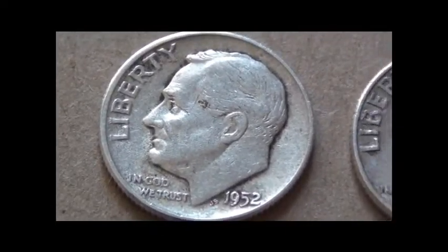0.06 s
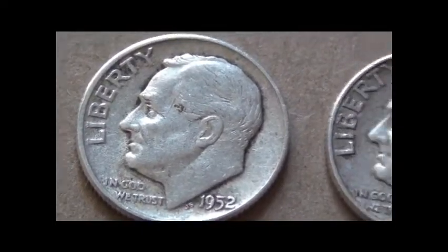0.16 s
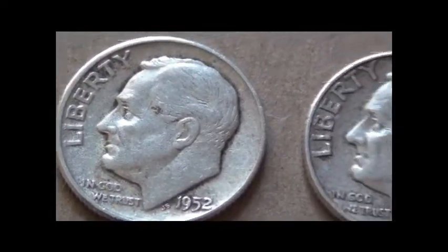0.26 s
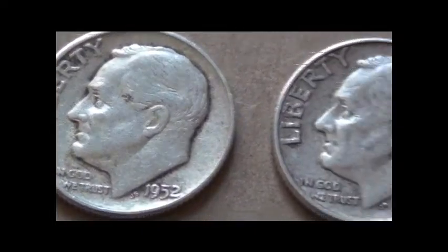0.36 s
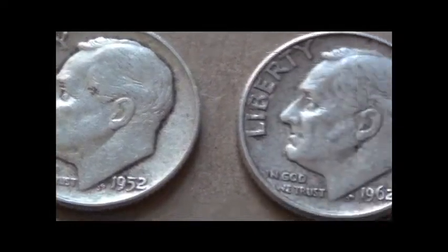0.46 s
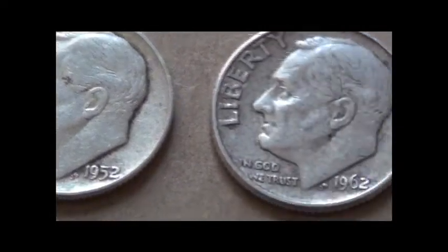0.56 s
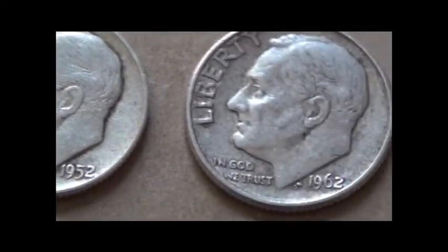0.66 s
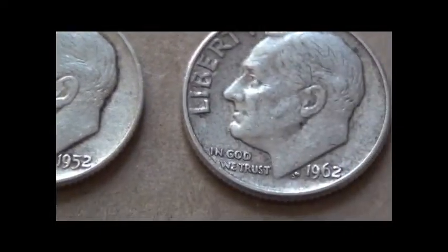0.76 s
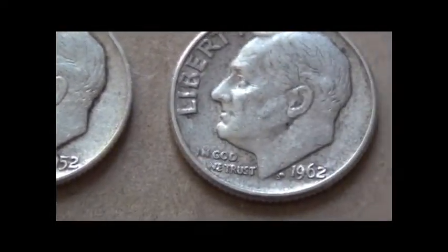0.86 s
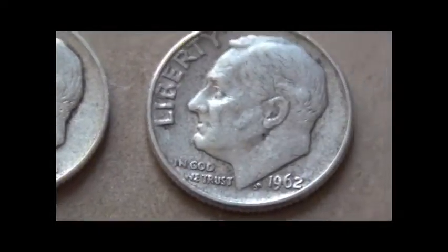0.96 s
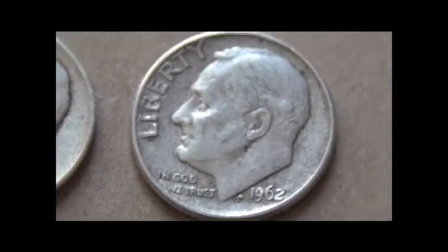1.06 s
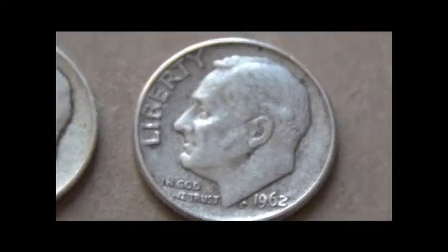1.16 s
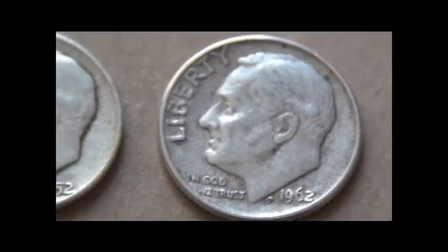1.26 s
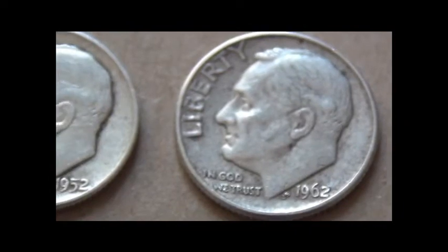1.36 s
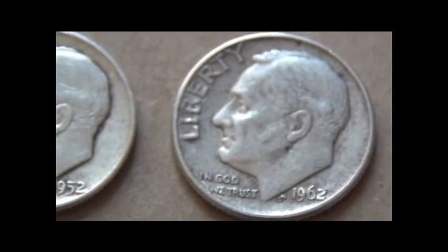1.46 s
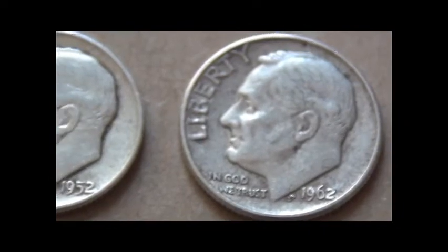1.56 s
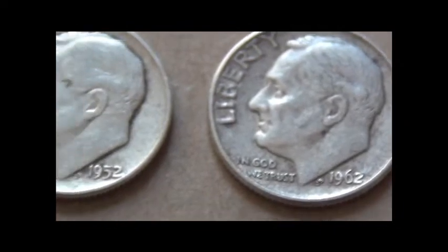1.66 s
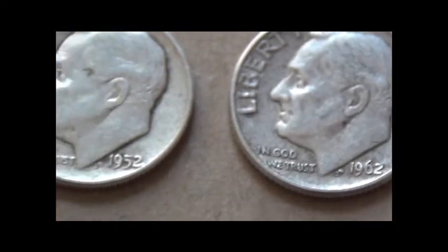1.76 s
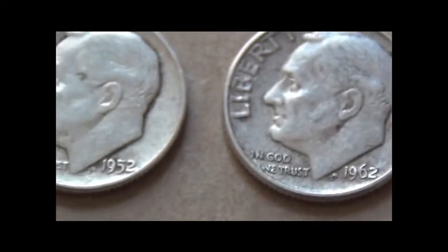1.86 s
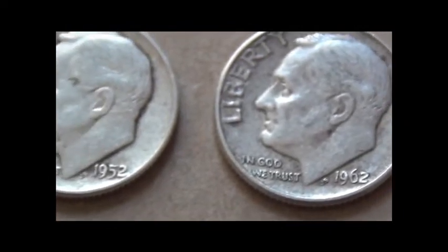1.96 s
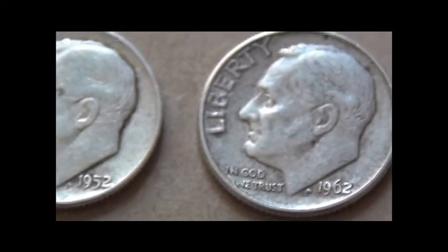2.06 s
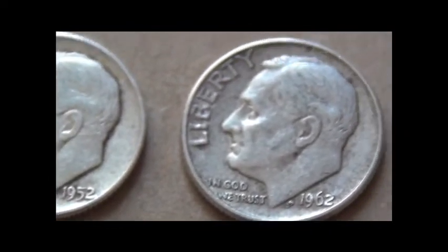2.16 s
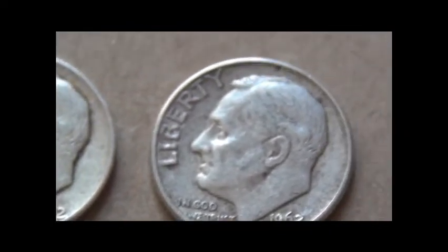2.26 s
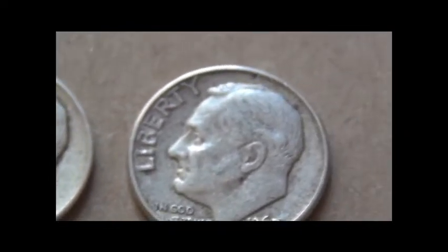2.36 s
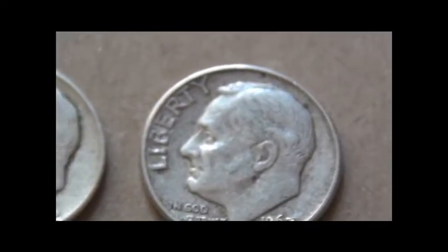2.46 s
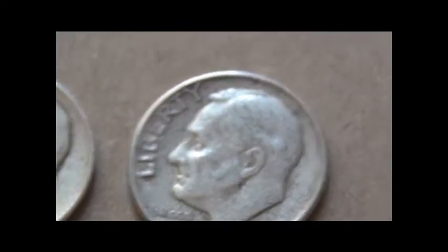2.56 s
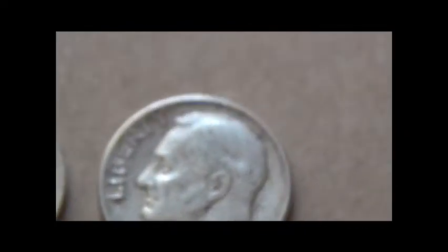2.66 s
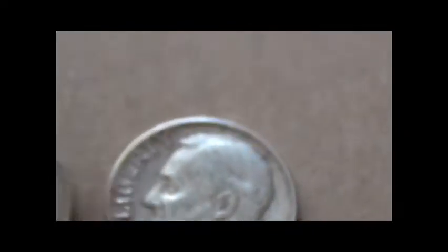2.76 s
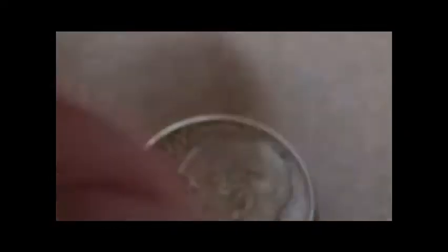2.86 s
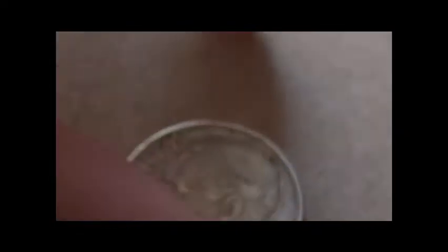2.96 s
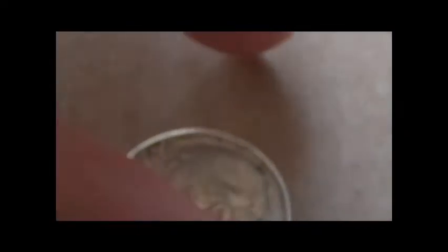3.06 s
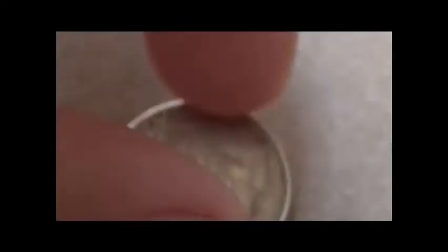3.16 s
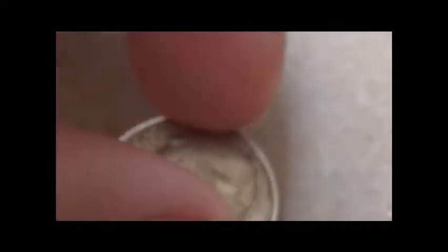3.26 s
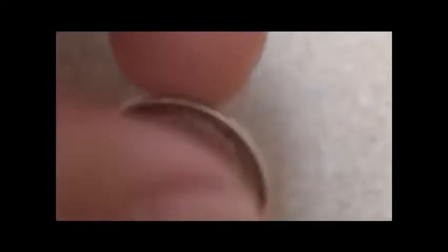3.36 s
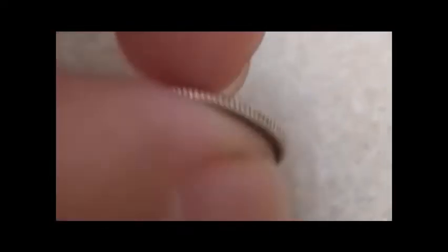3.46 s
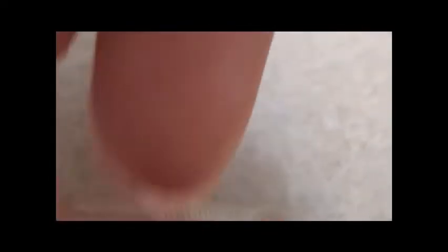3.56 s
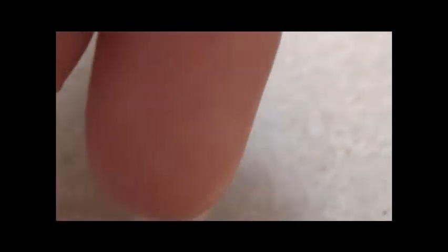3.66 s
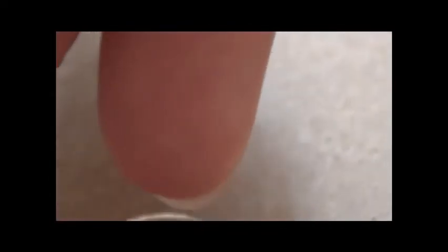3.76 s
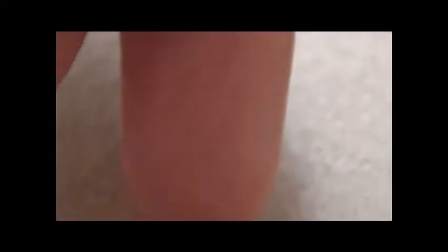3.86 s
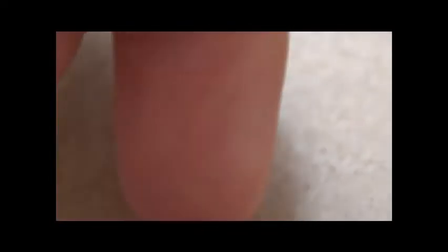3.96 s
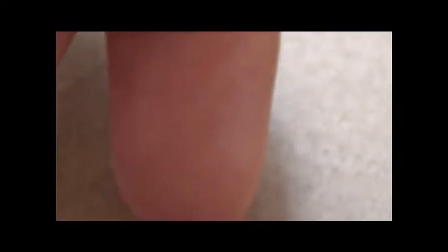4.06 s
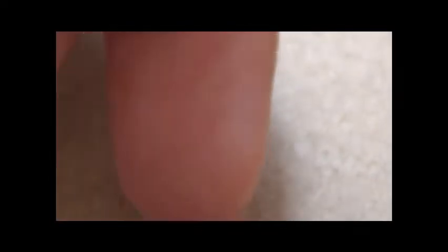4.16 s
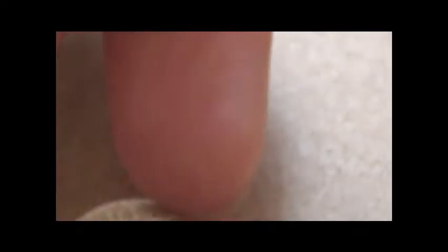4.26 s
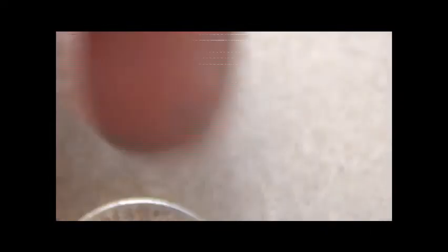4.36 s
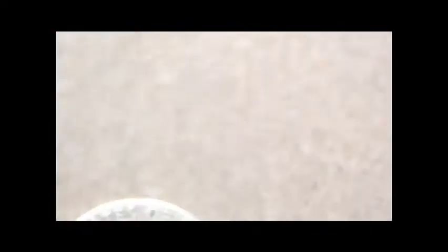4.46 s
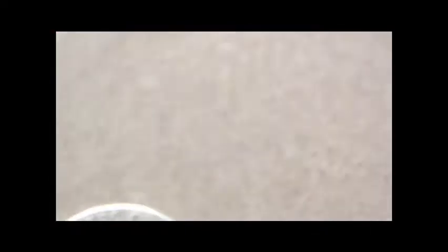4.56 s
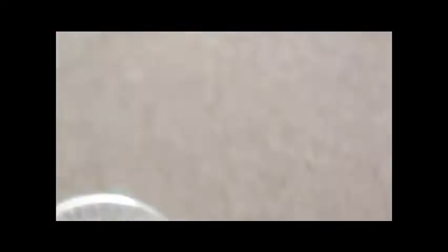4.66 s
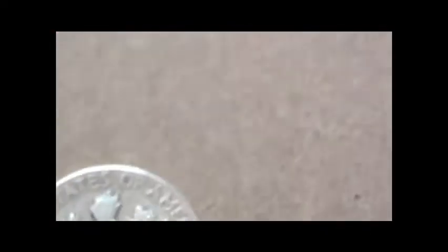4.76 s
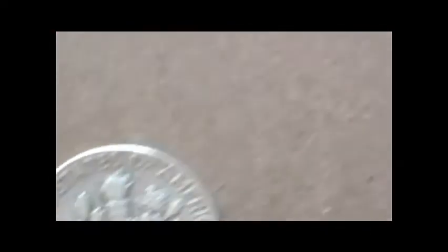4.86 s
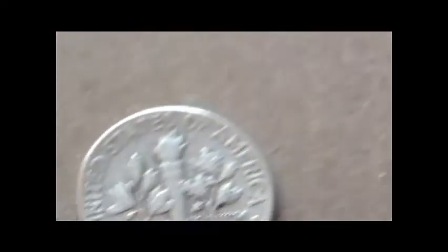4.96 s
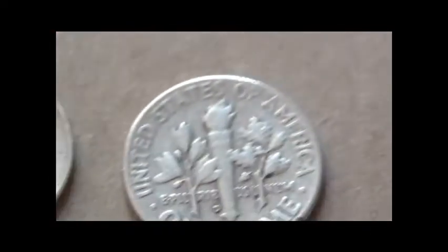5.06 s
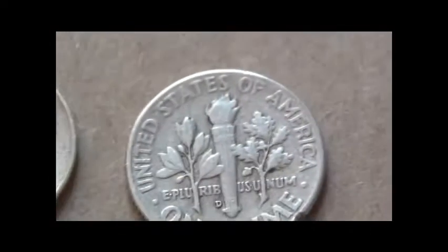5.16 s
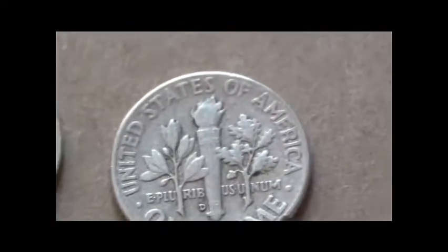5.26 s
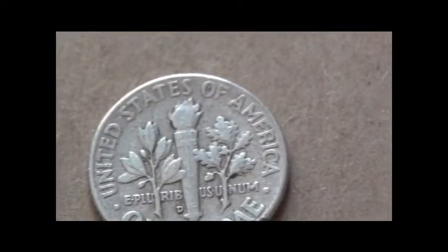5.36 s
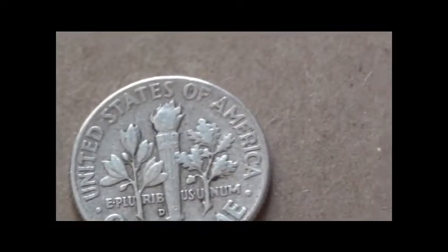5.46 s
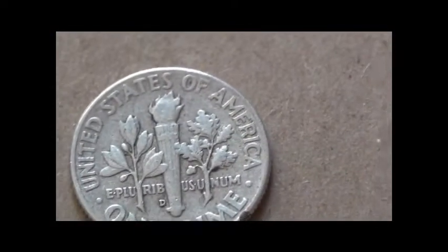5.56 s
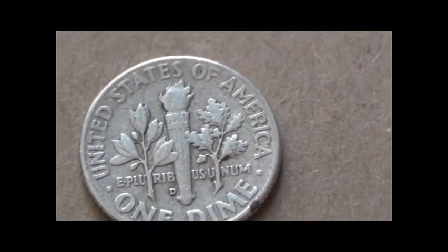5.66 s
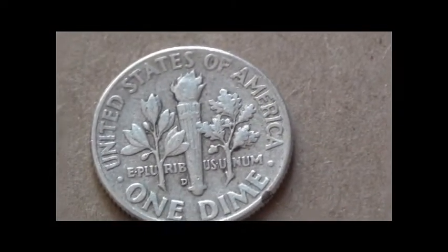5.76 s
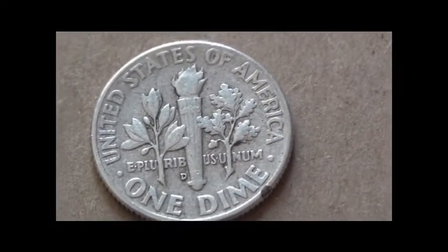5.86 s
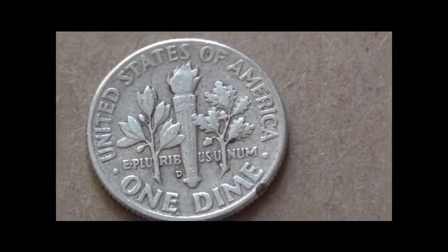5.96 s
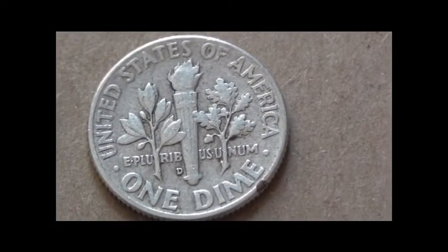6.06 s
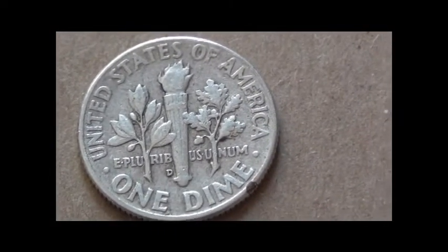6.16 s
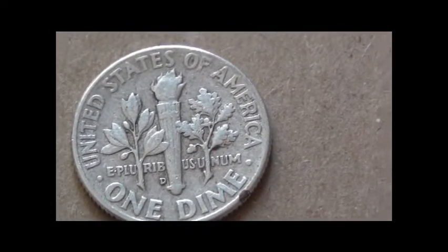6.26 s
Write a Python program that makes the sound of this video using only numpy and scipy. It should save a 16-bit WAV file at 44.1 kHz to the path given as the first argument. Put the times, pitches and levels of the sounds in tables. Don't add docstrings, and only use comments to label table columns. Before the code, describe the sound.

Close hand-held camera in a quiet room: soft hiss, low handling rumble and a faint whining, ticking lens motor. A hand thumps the desk once with a dull boom. Later fingers press a small coin, scrape its rim over cardboard in short rasps, and knock it sharply. It drops with two bright, hard clacks, then faint skin brushes fade back into hiss.

```python
import sys
import numpy as np
from scipy import signal
from scipy.io import wavfile

SR = 44100
rng = np.random.default_rng(int(sys.argv[2]) if len(sys.argv) > 2 else 0)


def linear_from_db(decibels):
    return 10 ** (np.asarray(decibels, float) / 20)


def to_wav(s):
    ch = np.atleast_2d(s).T
    pcm = np.round(np.clip(ch, -1, 1) * 32767)
    wavfile.write(sys.argv[1], SR, pcm.astype(np.int16))


N = 277830

# start in seconds, peak in dB, contact hardness in Hz,
# level of the stiff card tones in dB.
PRESSES = [(2.4896, -44, 2520, -24), (2.654, -39.5, 3000, 11), (2.9458, -17, 2570, 0),
           (3.081, -29.5, 2500, 3), (3.251, -34, 6050, 2), (3.566, -23, 2000, -1), (3.866, -29.5, 2500, -2),
           (4.343, -49, 2980, 16)]
# start in seconds, peak in dB, contact hardness in Hz, level of the
# stiff card tones in dB, drum pitch as the grip loads the sheet as a ratio.
RIM_HITS = [(3.152, -31, 1500, -3, 0.96), (3.1765, -7, 3800, -2.5, .9), (3.3945, -21, 1500, 0, 1.15),
            (3.4125, -21, 1500, -3, 1.12), (3.4716, -10, 3620, -2, 1.008), (3.7505, -27, 1010, 14, 1.02),
            (3.7562, -24, 1220, 8, 0.95)]
# start in seconds, peak in dB, contact hardness in Hz,
# level of the stiff card tones in dB.
BOUNCES = [(3.7757, -6.5, 5170, 9.5), (3.8005, -9.5, 6900, 7.5), (3.811, -28, 2000, 6),
           (3.89, -26, 2500, -1), (3.934, -44.5, 1200, -6)]
PRESS_DESK_DB, RIM_DESK_DB, BOUNCE_DESK_DB = -12, -26, -35
COIN_FREE_S, COIN_FREE_DB = 3.7772, -32.5

# pitch in Hz, level in dB, 60 dB decay in seconds.
CARD_DRUM = [(711, 3.5, 0.025), (213, -13.5, 0.063), (624, -20, 0.075), (305, -22.5, 0.14),
             (780, -34, 0.019)]
CARD_LOW = [(220, -14, 0.091), (313, -15.5, 0.08), (415, -1, 0.016), (550, 1, 0.036), (691, 5, 0.032),
            (794, 4, 0.03), (953, -5, 0.027)]
CARD_MID = [(1210, -2.5, 0.0096), (1554, 2.5, 0.0084), (1915, -1, 0.0069), (2633, -1.5, 0.0078),
            (2990, 0, 0.0064), (3387, 3, 0.0037)]
CARD_TOP = [(5340, -4.5, 0.0047), (7090, -4.5, 0.0049), (9500, 5.5, 0.0015), (11500, 7, 0.00077),
            (13300, -2.5, 0.0022), (15200, -10, 0.0022)]
# pitch in Hz, level in dB, 60 dB decay in seconds.
COIN = [(8880, -9, .1), (8880, -9, .035), (8760, -18, .1), (14900, -14, .05), (14960, 0, .07),
        (14960, -1, .015)]
# pitch in Hz, level in dB, 60 dB decay in seconds.
DESK = [(108.4, -7, 0.29), (138.3, -18, 0.63), (189, 9, 0.079), (237.8, 0.5, 0.18), (363, 5.5, 0.13),
        (426, 6, 0.05), (565, -13, 0.069), (744, 5.5, 0.041), (860, -17, .03)]
DESK_BOOM = [(75.7, 0, 0.27), (60.7, 0, 0.2)]

# moment of most pressure in seconds, card drone in dB,
# rise in seconds, fall in seconds, speed as rasp in dB over the drone.
STROKES = [(3.000, -52.5, 0.059, 0.035, -2), (3.041, -43, 0.035, 0.02, -5.5),
           (3.097, -46.5, 0.021, 0.054, 0.5), (3.158, -33, 0.041, 0.027, -4.5),
           (3.176, -34, 0.024, 0.012, 1), (3.199, -41, 0.046, 0.034, -5), (3.271, -48.5, 0.04, 0.02, -1.5),
           (3.380, -40.5, 0.027, 0.037, -0.5), (3.400, -31, 0.022, 0.027, 3),
           (3.415, -29.5, 0.014, 0.0047, 7.5), (3.429, -45, 0.019, 0.034, -4),
           (3.499, -39, 0.0081, 0.011, -6.5), (3.573, -42, 0.0054, 0.034, 8),
           (3.589, -29, 0.029, 0.038, -2), (3.625, -35.5, 0.017, 0.011, -10),
           (3.672, -32, 0.049, 0.061, -6.5), (3.71, -33, 0.023, 0.0085, -12),
           (3.755, -31, 0.022, 0.027, -13.5), (3.792, -42, 0.016, 0.015, 1),
           (3.819, -48, 0.0079, 0.05, -0.5), (3.902, -50, 0.055, 0.026, -1)]
# moment of most pressure in seconds,
# card drone in dB, speed as rasp in dB over the drone.
BRUSHES = [(4.037, -58.5, -0.5), (4.177, -62, 8.5), (4.209, -57, 3.5), (4.232, -53, -4.5),
           (4.260, -63, -3.5), (4.289, -57.5, -1), (4.335, -63, -2), (4.37, -70, -3), (4.40, -80, 9)]
BRUSH_RISE_S, BRUSH_FALL_S = 0.016, 0.03
# start in seconds, peak in dB, pitch in Hz, ring in cycles.
TICKS = [(.330, -42.5, 960, 17), (0.9776, -31, 10600, 8.9), (1.009, -47, 2170, 16), (1.6274, -28, 2850, 19),
         (1.629, -25.5, 377, 18), (1.628, -30, 8400, 98), (1.639, -36, 2900, 46), (1.645, -42, 8500, 40),
         (1.682, -31, 830, 12.6), (1.756, -39.5, 8100, 25), (1.628, -33, 11500, 13), (2.490, -44, 3230, 15),
         (2.490, -38.5, 4800, 14), (2.490, -40.5, 8700, 15), (4.175, -54, 7550, 17),
         (4.2102, -38, 9500, 4.3), (4.288, -45.5, 2900, 14), (4.289, -54, 8700, 20), (4.567, -48, 6000, 4),
         (4.852, -47, 2200, 8), (4.908, -49, 2280, 16)]
# start in seconds, peak in dB, contact hardness in Hz, boom in dB.
THUMPS = [
    (1.6264, -14, 510, -11),
    (2.489, -35.5, 590, -26),
    (2.947, -28.5, 410, -15),
]

# time in seconds, rumble in dB.
GRIP = [(0, -64), (0.35, -67), (0.7, -52), (0.82, -60), (1.03, -59), (1.2, -66.5), (1.32, -59),
        (1.5, -66.5), (1.8, -60), (2.2, -65.5), (2.9, -63.5), (3.95, -73.5), (4.2, -63), (4.55, -83),
        (4.75, -67.5), (5.13, -69.5), (5.5, -72.5), (6.3, -64.5)]
# frequency in Hz, density in dB per Hz.
RUMBLE = [(15, -50), (25, 5), (71, -13), (118, 5), (162, -40), (211, 1.5), (299, 1), (500, -11.5),
          (650, -28), (1100, -120)]
# moment in seconds (the jolt sets in about 25 ms before it), peak in dB.
JOLTS = [(0.12, -59), (0.741, -56), (0.846, -62), (1.017, -50), (1.315, -54), (2.1, -68), (2.35, -57),
         (3.28, -48), (3.6, -56), (4.831, -56), (5.0, -65)]
# pitch in Hz, level in dB, 60 dB decay in seconds.
JOLT_TONES = [(55, -3, 0.15), (90.5, -3, 0.17)]

# time in seconds, whine in dB.
MOTOR = [(0.03, -78), (0.055, -55.5), (0.6, -55.5), (1.0, -61), (1.12, -68), (2.2, -71), (2.9, -72),
         (3.95, -64.5), (4.36, -65.5), (4.39, -62.5), (5.02, -63), (5.19, -70.5), (5.24, -68.5),
         (5.8, -66.5), (6.3, -79)]
# centre in seconds, level in dB.
SURGES = [(0.385, -49.5), (0.588, -55), (0.735, -60), (1.0, -67), (2.30, -60), (2.655, -63), (2.831, -79),
          (4.57, -58.5), (4.69, -66), (4.775, -54), (4.92, -61), (5.385, -64)]
SURGE_S, WHINE_HZ = 0.034, 906
# time in seconds, click peak in dB, pitch in Hz.
LENS = [(0, -61, 2700), (1.0, -59, 2740), (2.9, -57.5, 2735), (3.9, -59.5, 2560), (4.7, -61, 2650),
        (5.2, -58, 2480), (5.35, -58, 2640), (5.7, -64, 2740), (6.3, -64, 2720)]
# from in seconds, to in seconds.
LENS_RESTS = [(4.15, 4.42), (4.82, 5.21)]
FRAME_RATE = 29.97

# time in seconds, gain in dB.
GAIN = [(0, 0), (2.9, -0.5), (3.78, 2), (3.83, -7.5), (6.3, -5.5)]
# frequency in Hz, density in dB per Hz.
HISS = [(24, -46), (40, -21), (112, 1), (147, -10), (231, 0), (382, -10.5), (600, -4), (751, -9),
        (896, -3.5), (1680, -10), (2770, -10.5), (3380, -13.5), (16000, -17)]
HISS_DB = -53.5
# pitch in Hz, width in Hz, level in dB.
HUMS = [(227, 92, -72.5), (610.8, 69, -68.5), (1211, 23, -73.5), (2245, 110, -73)]
LINE_HZ = 15734
# frequency in Hz, likeness from 0 to 1.
LIKENESS = [(60, 0.97), (180, 0.97), (550, 0.14), (1650, 0.13), (4970, 0.42), (15000, 0.77)]


def rms_one(x):
    return x / np.sqrt(np.mean(x ** 2) + 1e-20)


def in_time(rows):
    s, *columns = np.transpose(rows)
    return [np.interp(np.arange(N) / SR, s, column) for column in columns]


def at_hz(points, hz):
    table_hz, value = np.transpose(points)
    return np.interp(np.log(hz), np.log(table_hz), value)


def drift(rate):
    r = np.exp(-80 * np.pi * rate / SR)
    white = rng.standard_normal(N // 40 + 2002)
    slow = signal.lfilter([1], [1, -2 * r, r * r], white)[2000:]
    return np.interp(np.arange(N) / 40, np.arange(len(slow)), rms_one(slow))


def band(x, low_hz, high_hz):
    return signal.sosfilt(signal.butter(2, [low_hz, high_hz], "band", fs=SR, output="sos"), x)


def ring(force, modes, scatter_db=0):
    out = 0
    for k, (hz, level_db, t60) in enumerate(modes):
        r = linear_from_db(-60 / (t60 * SR))
        w = 2 * np.pi * hz / SR
        gain = (-1) ** k * linear_from_db(level_db + scatter_db * rng.standard_normal())
        out = out + gain * signal.lfilter([0, np.sin(w)], [1, -2 * r * np.cos(w), r * r], force + 1e-18)
    return out


def contact(hz):
    push = np.zeros(SR // 4)
    push[0] = -1
    return signal.sosfilt(signal.butter(2, np.clip(hz, 50, .45 * SR), fs=SR, output="sos"), push)


def add(out, s, sound, peak_db, pan_db=0):
    i = round((s + .001) * SR)
    sound = sound[:N - i] / abs(sound).max()
    out[:, i:i + len(sound)] += sound * linear_from_db(peak_db + pan_db * np.array([[.5], [-.5]]))


def knocks():
    out = np.zeros((2, N))
    for blows, desk_db in ((PRESSES, PRESS_DESK_DB), (RIM_HITS, RIM_DESK_DB), (BOUNCES, BOUNCE_DESK_DB)):
        for s, peak_db, hz, stiff_db, *ratio in blows:
            push = contact(hz)
            sheet = np.array(CARD_DRUM) * [np.prod(ratio), 1, 1]
            drum, stiff, top = [ring(push, modes, scatter_db=1.5) for modes in (sheet, CARD_MID, CARD_TOP)]
            snap = linear_from_db(-3) * np.diff(push, prepend=0)
            add(out, s, drum + linear_from_db(stiff_db) * (stiff + top + snap), peak_db, pan_db=2)
            add(out, s, ring(contact(750), DESK), peak_db + desk_db)
    add(out, COIN_FREE_S, ring(contact(14000), COIN), COIN_FREE_DB, pan_db=5)
    return out


def strokes():
    t = np.arange(N) / SR
    power = np.zeros((3, N))
    brushes = [(s, db, BRUSH_RISE_S, BRUSH_FALL_S, speed_db) for s, db, speed_db in BRUSHES]
    for s, drone_db, rise, fall, rasp_db in STROKES + brushes:
        hiss_db = rasp_db - 7.5
        pressure = np.interp(t, [s - rise, s, s + fall], [0, 1, 0])
        power += (pressure ** 0.95 * linear_from_db(drone_db + np.array([[0], [rasp_db], [hiss_db]]))) ** 2
    out, clumps = 0, drift(130)
    for modes, level, catches_per_s in zip([CARD_LOW, CARD_MID, CARD_TOP], np.sqrt(power), [1500, 2500, 6000]):
        size_db = 1.8 * np.minimum(rng.exponential(1, (2, N)), 5) + 1.6 * clumps
        sizes = linear_from_db(size_db) * rng.choice([-1, 1], (2, N))
        caught = rng.random((2, N)) < catches_per_s / SR
        mid, side = ring(sizes * caught, modes)
        out = out + level * rms_one(mid + 0.13 * side * [[1], [-1]])
    return out * linear_from_db([[.7], [-.7]])


def ticks():
    out = np.zeros((2, N))
    for s, peak_db, hz, cycles in TICKS:
        tones = [(hz, 0, cycles / hz), (hz * 1.16, -5, cycles / hz / 2)]
        add(out, s, ring(contact(9100), tones), peak_db)
    return out


def thumps():
    out, t = np.zeros((2, N)), np.arange(SR // 4) / SR
    for s, peak_db, hz, boom_db in THUMPS:
        push = contact(hz)
        add(out, s, ring(push, DESK) + linear_from_db(52) * push, peak_db)
        add(out, s, ring(push, DESK_BOOM), peak_db + boom_db)
        rattle = band(rng.standard_normal(len(t)), 300, 950) * linear_from_db(-60 * t / 0.18)
        add(out, s + 0.00202, rattle, peak_db - 17)
    return out


def room(x):
    t = np.arange(SR // 4) / SR
    tail = rng.standard_normal((2, len(t))) * linear_from_db(-60 * t / 0.26) * (t > .003)
    tail = signal.lfilter([1], [1, -.6], tail)
    return linear_from_db(-54.5) * signal.fftconvolve(x, tail, axes=1)[:, :N]


def coloured(spectrum, patchy_db, count):
    edges = np.geomspace(spectrum[0][0], spectrum[-1][0], num=count)
    out, white = 0, rng.standard_normal((2, 2, N))
    for k, (low, high) in enumerate(zip(edges, edges[1:])):
        mid, side = band(white[k % 2], low, high)
        alike = np.clip(np.sqrt(at_hz(LIKENESS, low)), 0, 1)
        gain = linear_from_db(at_hz(spectrum, np.sqrt(low * high)) + patchy_db * drift(8))
        out = out + gain * (np.sqrt(1 + alike) * mid + np.sqrt(1 - alike) * side * [[1], [-1]])
    return rms_one(out)


def narrow(hz, width_hz):
    sos = signal.butter(1, [hz - width_hz / 2, hz + width_hz / 2], "band", fs=SR, output="sos")
    return rms_one(signal.sosfilt(np.vstack([sos, sos]), rng.standard_normal(N)))


def grip():
    out = linear_from_db(in_time(GRIP)[0] + 1.5 * drift(9)) * coloured(RUMBLE, patchy_db=3.5, count=10)
    for s, peak_db in JOLTS:
        add(out, s - .025, ring(contact(70), JOLT_TONES), peak_db)
    return out


def lens_motor():
    t = np.arange(N) / SR
    surge = sum(linear_from_db(db) * np.exp(-((t - s) / SURGE_S) ** 2 * 2) for s, db in SURGES)
    tone = np.sqrt(2) * np.sin(2 * np.pi * np.cumsum(WHINE_HZ + 14 * drift(20.74)) / SR)
    whine = rms_one(narrow(900, 104) + 0.41 * tone)
    return linear_from_db(in_time(MOTOR)[0] + 0.57 * drift(25)) * whine + surge * tone


def lens_clicks():
    out, (click_db, hz) = np.zeros((2, N)), in_time(LENS)
    t = np.arange(round(0.0096 * SR)) / SR
    step_s = (np.arange(1, 188) - .25) / FRAME_RATE
    for s, (pitch_chance, level_chance) in zip(step_s, rng.standard_normal((187, 2))):
        i = round(s * SR)
        blip = np.sin(2 * np.pi * hz[i] * (1 + .008 * pitch_chance) * t) * np.hanning(len(t))
        if not any(a < s < b for a, b in LENS_RESTS):
            add(out, s, blip, click_db[i] + 2 * level_chance)
    return out


def floor():
    hums = sum(linear_from_db(level_db) * narrow(hz, width_hz) for hz, width_hz, level_db in HUMS)
    whistle = linear_from_db(-72 + 1.2 * drift(6)) * np.sin(2 * np.pi * LINE_HZ * np.arange(N) / SR)
    hiss = linear_from_db(HISS_DB) * coloured(HISS, patchy_db=.4, count=22)
    return linear_from_db(in_time(GAIN)[0]) * (hiss + hums + whistle)


def scene():
    hits = knocks() + ticks()
    contacts = hits + room(hits) + strokes() + thumps()
    return contacts + grip() + lens_motor() + lens_clicks() + floor()


def top_cut(x):
    return signal.sosfilt(signal.butter(12, 16940, fs=SR, output="sos"), x)


def record(dry):
    mic = signal.sosfilt(signal.butter(2, 45, "high", fs=SR, output="sos"), dry)
    mix = signal.sosfilt(signal.ellip(8, .3, 30, 15950, fs=SR, output="sos"), mic)
    return top_cut(mix)


dry = scene()
out = record(dry)
to_wav(out)
```